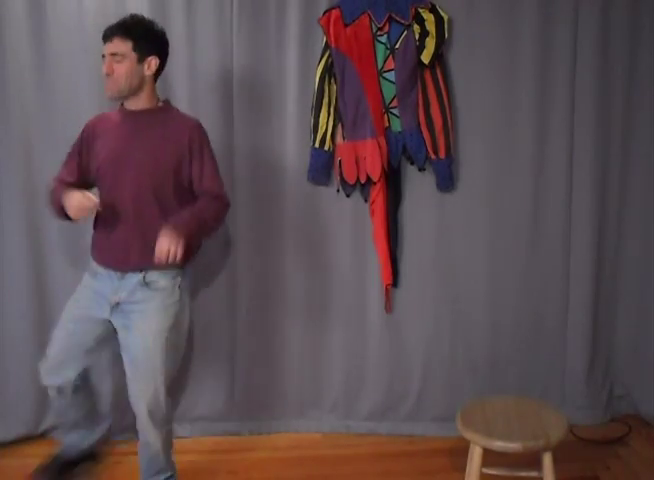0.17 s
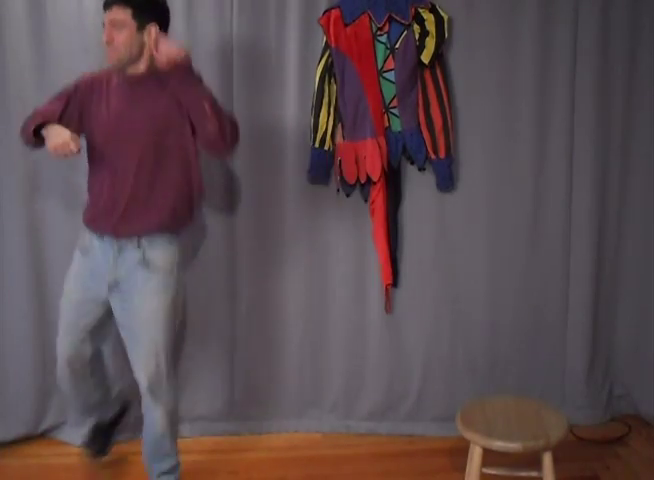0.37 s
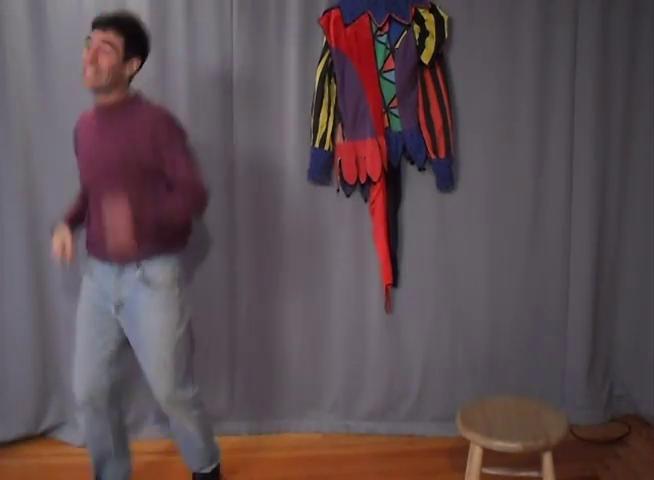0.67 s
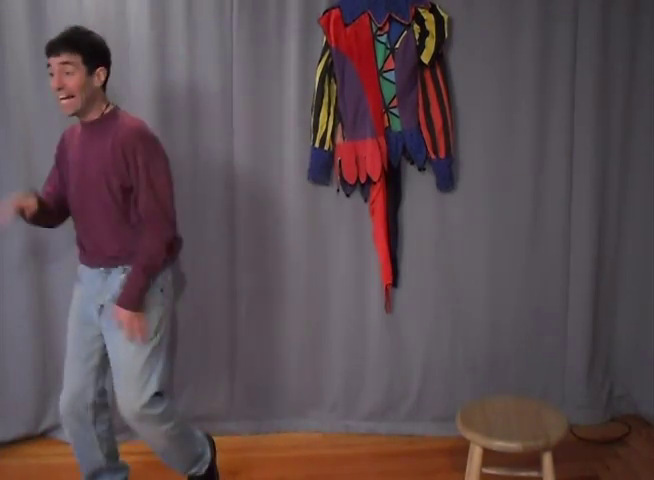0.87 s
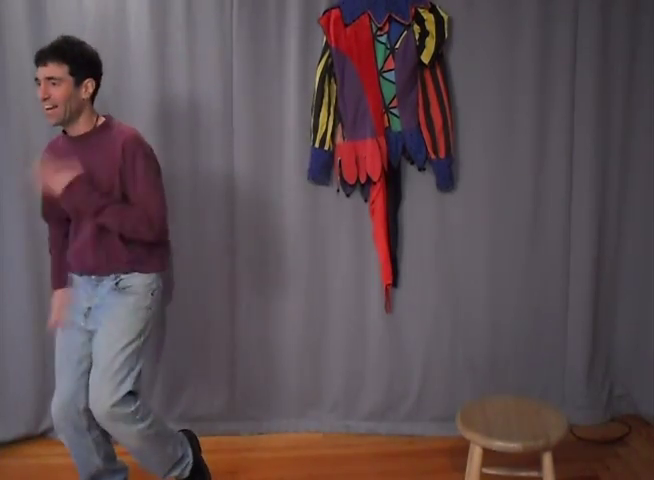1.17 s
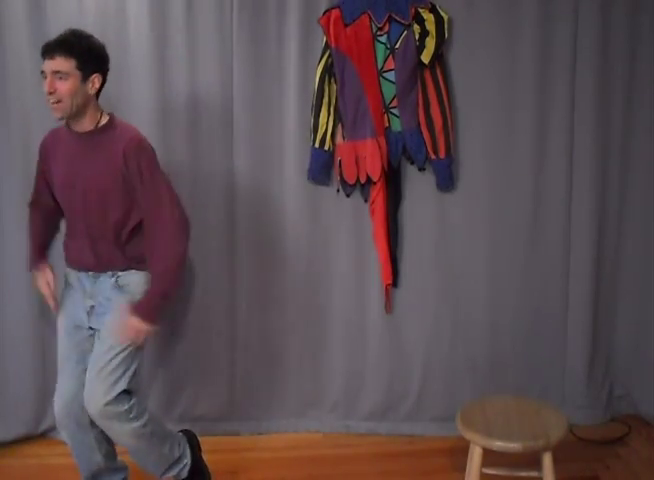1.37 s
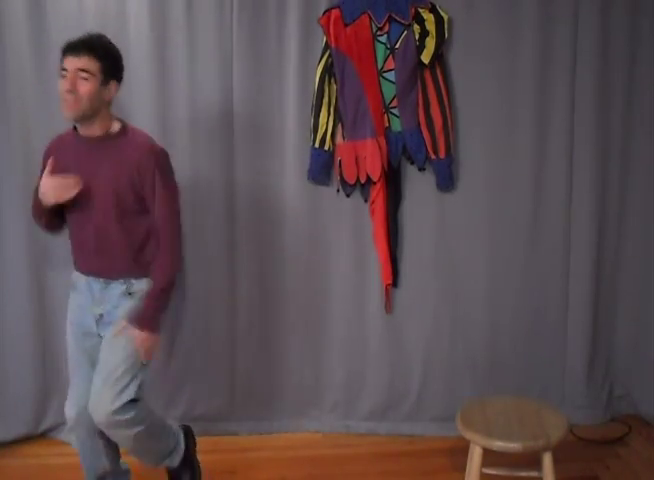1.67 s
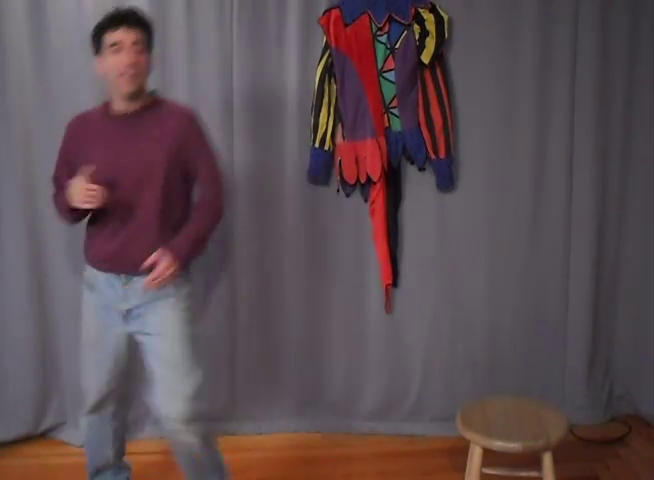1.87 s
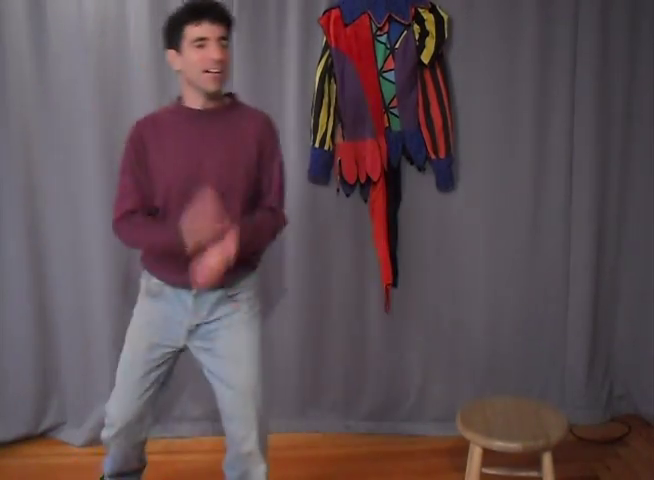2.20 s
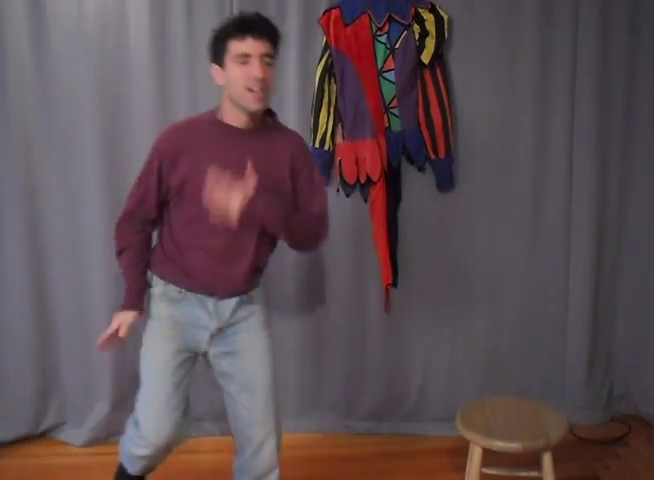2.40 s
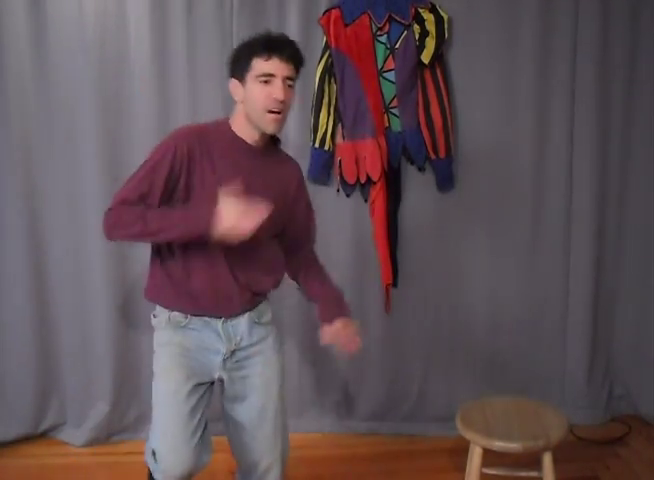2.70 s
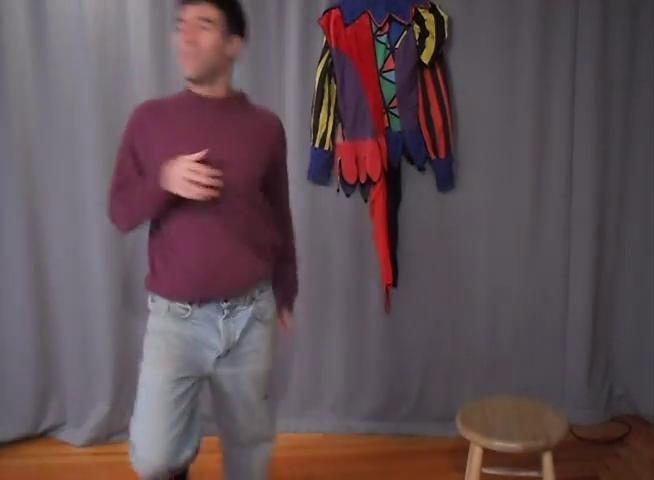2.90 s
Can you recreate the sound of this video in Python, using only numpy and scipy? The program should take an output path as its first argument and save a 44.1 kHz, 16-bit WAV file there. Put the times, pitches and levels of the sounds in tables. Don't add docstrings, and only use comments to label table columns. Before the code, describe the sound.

Body percussion in a small live room: a finger snap over a heavy step at 0.1 s, slaps at 0.23 and 0.33, another at 0.6, then a snap with the deepest floor thud around 0.72. Hollow slaps follow at 1.13, 1.2, 1.37, 1.6 and a ringing one at 1.7; a dull scuffing step near 2.0, slaps at 2.25, 2.34, 2.55, snaps at 2.78 and 2.85. Faint hum and hiss.

```python
import sys
import numpy as np
from scipy import signal
from scipy.fft import rfft, irfft
from scipy.io import wavfile

SR = 44100
rng = np.random.default_rng(int(sys.argv[2]) if len(sys.argv) > 2 else 0)


def transcribe(signal):
    frames = np.atleast_2d(signal).T
    limited = np.clip(frames, -1, 1)
    pcm = np.round(limited * 32767).astype(np.int16)
    wavfile.write(sys.argv[1], SR, pcm)


def ratio(d):
    e = np.asarray(d, float) / 20
    return 10 ** e


N = 134505
LEAD_N, LONG_N = 4410, 32768
BINS_HZ = np.fft.rfftfreq(2048, 1 / SR)

# (frequency [Hz], density [dB per Hz])
HUM_SPECTRUM = [(12, -36), (20, 19.5), (43, 4.5), (156, -5.5), (503, -13.5), (687, -14.5), (2460, -21.5),
                (9250, -26.5), (10000, -31.5), (13000, -65.5), (22000, -120)]
# (time [s], level [dB], push length [s], sway [dB])
LANDINGS = [(-.02, -32, .024, -3), (.121, -22, .024, -10), (.235, -25, .024, -9), (.33, -29, .024, -9),
            (.636, -18, .026, -13), (.733, -13.5, .026, -17), (.762, -27, .036, -10), (.824, -22, .034, -8),
            (1.125, -40, .03, -6), (1.62, -38, .02, -8), (1.992, -20, .03, -13), (2.02, -29, .024, -9),
            (2.082, -30, .034, -8), (2.295, -44, .045, -9), (2.8, -44, .02, -5), (2.89, -44, .024, -3)]
# (frequency [Hz], level [dB], t60 [s])
JOIST_MODES = [(30, -8, .65), (36, -14, .4), (46, -9, .4), (57, -11, .35), (70, -13, .3), (90, -14, .3),
               (120, -17, .25)]
# (time [s], level [dB], board note [Hz])
HEELS = [(-.03, -36.5, 150), (.116, -26, 156), (.227, -20, 210), (.297, -39.5, 210), (.330, -26, 230),
         (.611, -20, 250), (.72, -39, 278), (.78, -35.5, 183), (1.125, -44.5, 333), (1.366, -36, 238),
         (1.370, -39.5, 95), (1.612, -39.5, 150), (1.699, -37.5, 462), (1.972, -26.5, 121),
         (2.01, -31, 151), (2.05, -39.5, 195), (2.255, -43.5, 312), (2.34, -41.5, 267), (2.56, -38.5, 257),
         (2.781, -36.5, 241), (2.848, -44.5, 106)]
# (time [s], length [s], level [dB], tilt [dB per octave])
BRUSHES = [
    (-.04, 0.016, -23.5, -3.5),
    (.298, 0.013, -59, 25),
    (.814, 0.0038, -28, -3),
    (1.52, 0.01, -31, -3.5),
    (1.902, 0.013, -31, -3),
    (1.98, 0.045, -21, -6.5),
    (2.495, 0.024, -28, -6),
]
# (time [s], peak level [dB], note [Hz], t60 [s])
HOLLOWS = [(.335, -32.5, 718, 0.15), (0.613, -33.5, 464, 0.15), (1.132, -34.5, 546, 0.15),
           (1.196, -29.5, 520, .3), (1.368, -38, 518, 0.088), (1.53, -45, 350, 0.2),
           (1.700, -26.5, 1245, 0.12), (1.700, -39.5, 480, 0.073), (2.342, -38.5, 480, 0.29),
           (2.545, -38, 480, 0.26), (2.55, -27, 593, 0.18), (2.85, -26, 480, 0.14)]
# (time [s], level [dB], tilt [dB per octave], cupped-air level [dB], cupped-air note [Hz])
SLAPS = [(.227, -12, -5, 0, 1660), (.328, -13.5, -0.5, 24, 695), (.611, -6, -8, -35, 480),
         (1.125, -16.5, 1, 7, 555), (1.1955, -12, -2, -1, 536), (1.368, -9.5, -4.5, 4, 900),
         (1.612, -14, -5, -9, 1060), (1.700, -13.5, -5, -10, 1220), (1.972, -21, -5.5, -60, 1530),
         (2.252, -15.5, -1, -80, 2500), (2.339, -12.5, -4, 7, 480), (2.548, -20.5, -2, 14.5, 528),
         (1.1925, -15, -4.5, -1, 722), (2.538, -27, -8, -4, 1500), (2.543, -16.5, -6, 5, 900),
         (1.121, -21.5, -5, 10, 2840)]
# (time [s], level [dB], tilt [dB per octave], cupped-air level [dB], cupped-air note [Hz])
SNAPS = [
    (.114, -5, -10, 17.5, 2130),
    (.717, -8, -3, 16, 1940),
    (2.781, -21, -5.5, -30, 400),
    (2.848, -12.5, -4.5, -10, 480),
]
# (frequency [Hz], gain [dB])
SKIN_COLOUR = [(60, -24), (150, -12), (300, 0), (800, 13.5), (2500, 13.5), (4000, 11), (9000, 3.5)]
# (delay [s], level [dB])
ECHOES = [(.0044, 0), (.0085, -7), (.0132, -5), (.019, -3), (.024, -8), (.031, -8)]
# (frequency [Hz], t60 [s])
WALL_DECAY = [(100, 0.43), (260, 0.22), (700, 0.3), (1840, 0.29), (4850, 0.23), (9000, 0.14)]
# (frequency [Hz], width [Hz], level [dB])
ROOM_NOTES = [(233, 10, -17), (350, 90, 0), (480, 52, 4.5), (587, 27, -6)]


def evened(x):
    return x / np.sqrt(np.mean(x ** 2) + 1e-20)


def read(points, hz):
    f, value = np.transpose(points)
    return np.interp(np.log(hz + 1), np.log(f + 1), value)


def add(mix, time_s, sound):
    part = mix[LEAD_N + round(time_s * SR):][:len(sound)]
    part += sound[:len(part)]


def bump(hz, centre_hz, width_hz):
    return 1 / np.sqrt(1 + (2 * (hz - centre_hz) / width_hz) ** 2)


def coloured(x, gain):
    mirrored = np.r_[gain, gain[-2:0:-1]]
    log_gain = np.log(np.maximum(mirrored, 1e-5))
    spectrum = np.exp(np.conj(signal.hilbert(log_gain)))
    taps = np.fft.ifft(spectrum).real
    return signal.fftconvolve(x, taps / np.linalg.norm(taps))


def sparse_taps():
    taps = np.zeros(LONG_N)
    slots = np.arange(0, LONG_N - 12, 12)
    draw = rng.random((2, len(slots)))
    offset = draw[1] - .5
    taps[slots + (draw[0] * 12).astype(int)] = np.sign(offset) * (.3 + 2 * abs(offset))
    return taps


def room(direct_db):
    build_s, ramp_s, tail_db = .005, .0054, 7.5
    late_db, late_stretch = -25.5, 4.1
    t = np.arange(LONG_N) / SR
    build = 1 - np.exp(-(t / build_s) ** 2)
    hz, when_s, z = signal.stft(sparse_taps() * build, SR, nperseg=512)
    fall_db = -60 * when_s / read(WALL_DECAY, hz)[:, None]
    fade = ratio(fall_db) + ratio(late_db + fall_db / late_stretch)
    even = np.linalg.norm(fade, axis=1) / np.linalg.norm(z * fade, axis=1)
    tail = signal.istft(z * fade * even[:, None], SR, nperseg=512)[1][:LONG_N]

    fine_hz = np.fft.rfftfreq(LONG_N, 1 / SR)
    notes = sum(ratio(db) * bump(fine_hz, f, w) ** 2 for f, w, db in ROOM_NOTES)
    tail = irfft(rfft(tail) * (1 + notes), LONG_N)
    tail *= ratio(tail_db) * np.minimum(t / ramp_s, 1) / np.linalg.norm(tail)
    tail[0] += ratio(direct_db)
    shifts = rng.uniform(-0.78, 1, len(ECHOES))
    for (delay_s, db), shift in zip(ECHOES, shifts):
        tail[round(delay_s * (1 + .08 * shift) * SR)] += ratio(db)
    return tail


def skin(tilt_db):
    octaves = np.log2(np.maximum(BINS_HZ, 500) / 1000)
    return ratio(read(SKIN_COLOUR, BINS_HZ) + tilt_db * octaves)


def hum():
    level_db = -50
    z = rng.standard_normal(N // 2 + 1) + 1j * rng.standard_normal(N // 2 + 1)
    gain = ratio(read(HUM_SPECTRUM, np.fft.rfftfreq(N, 1 / SR)))
    return ratio(level_db) * evened(irfft(z * gain, N))


def landing(db, length_s, sway_db):
    t = np.arange(LONG_N) / SR
    pulse = np.exp(-(t / length_s) ** 3)
    push = np.sin(2 * np.pi * t / length_s) * pulse * np.minimum(t / (.2 * length_s), 1)
    odd = rng.uniform(-1, 1, (len(JOIST_MODES), 2))
    sway = np.zeros(LONG_N)
    for (f_hz, mode_db, t60_s), (detune, phase) in zip(JOIST_MODES, odd):
        wave = np.sin(2 * np.pi * f_hz * (1 + 0.044 * detune) * t + np.pi * phase)
        sway += ratio(mode_db - 60 * t / t60_s) * wave
    return ratio(db) * (push + ratio(sway_db) * sway * (1 - pulse))


def heel(db, note_hz):
    rattle_s, width_share = 0.01, 1
    t = np.arange(4096) / SR
    knocks = rng.standard_normal(4096) * np.exp(-t / rattle_s) * 0.022
    knocks[0] = -1
    low_cut = np.minimum(BINS_HZ / 70, 1) ** 2
    gain = bump(BINS_HZ, note_hz, width_share * note_hz) ** 2 * low_cut
    return ratio(db + 16.5) * coloured(knocks, gain)


def brush(length_s, db, tilt_db):
    size = round(length_s * SR)
    swell = np.sin(np.pi * np.arange(size) / size)
    grit = rng.standard_normal(4096)[:size] * swell
    return ratio(db) * coloured(grit / np.linalg.norm(grit), skin(tilt_db))


def hollow(db, note_hz, t60_s):
    swell_s, beat_hz, partner_db = 0.0063, 28.2, -12
    t = np.arange(LONG_N // 2) / SR
    phase = 2 * np.pi * rng.random(2)
    note = np.sin(2 * np.pi * note_hz * t + phase[0])
    partner = np.sin(2 * np.pi * (note_hz + beat_hz) * t + phase[1])
    swell = 1 - np.exp(-t / swell_s)
    return ratio(db - 60 * t / t60_s) * swell * (note + ratio(partner_db) * partner)


def slap(db, tilt_db, cup_db, cup_hz, width_share=0.35):
    resonance = bump(BINS_HZ, cup_hz, width_share * cup_hz) ** 2
    cup = ratio(cup_db) * resonance * np.minimum(BINS_HZ / cup_hz, 1)
    return ratio(db) * coloured(-np.ones(1), skin(tilt_db) + cup)


def snap(*row):
    return slap(*row, width_share=0.57)


def scene():
    snap_direct_db, slap_direct_db, heel_direct_db = 1, -2, 6
    mix = np.zeros(N + LEAD_N)
    still = hum()
    for time_s, *row in LANDINGS:
        add(mix, time_s, landing(*row))
    airborne = ((HEELS, heel, heel_direct_db), (BRUSHES, brush, slap_direct_db),
                (SLAPS, slap, slap_direct_db), (SNAPS, snap, snap_direct_db))
    for rows, source, direct_db in airborne:
        for time_s, *row in rows:
            add(mix, time_s, signal.fftconvolve(source(*row), room(direct_db)))
    for time_s, *row in HOLLOWS:
        add(mix, time_s, hollow(*row))
    return (mix[LEAD_N:] + still)[None]


def roll_off(x):
    return signal.sosfilt(signal.butter(12, 10280, fs=SR, output="sos"), x)


def record(dry):
    edge_hz = 9950
    low_pass = signal.firwin(301, edge_hz, window=("kaiser", 9), fs=SR)
    cut = signal.oaconvolve(dry, low_pass[None], "same")
    return roll_off(cut)


dry = scene()
out = record(dry)
transcribe(out)
```